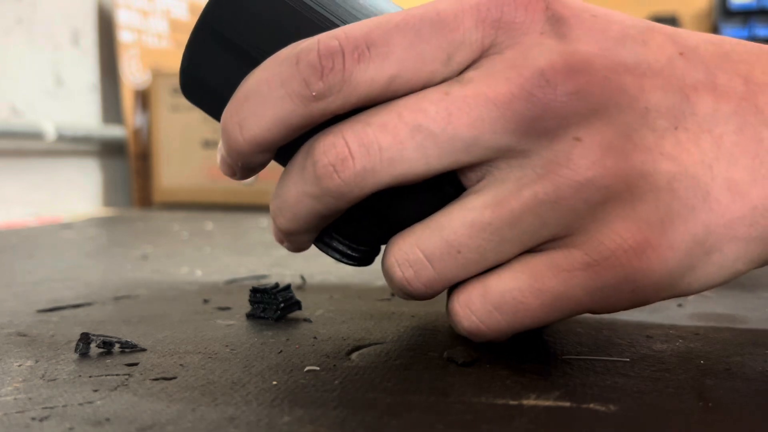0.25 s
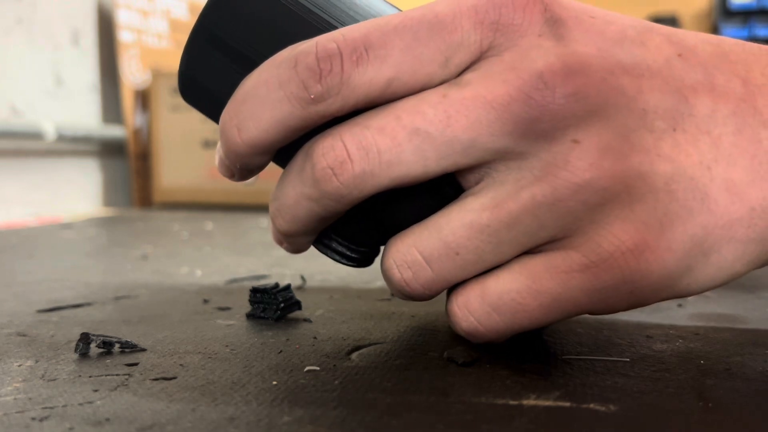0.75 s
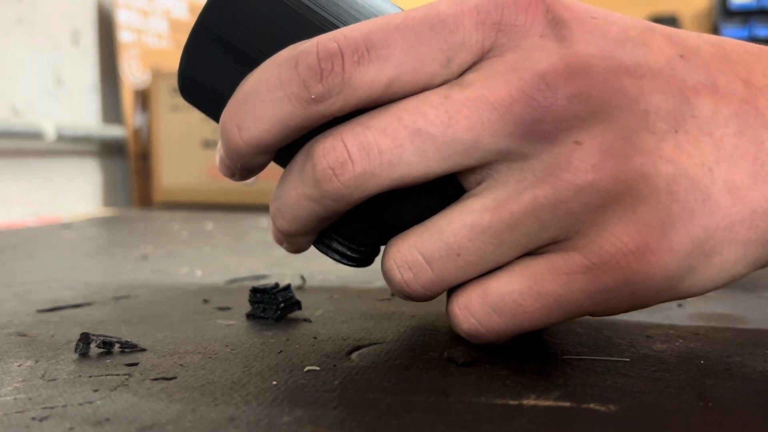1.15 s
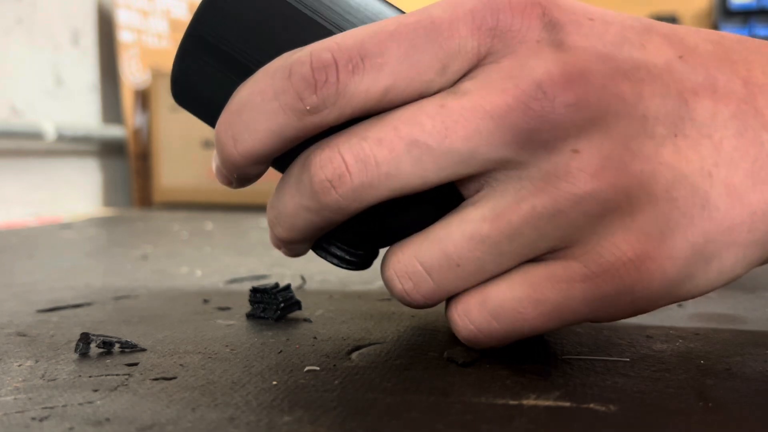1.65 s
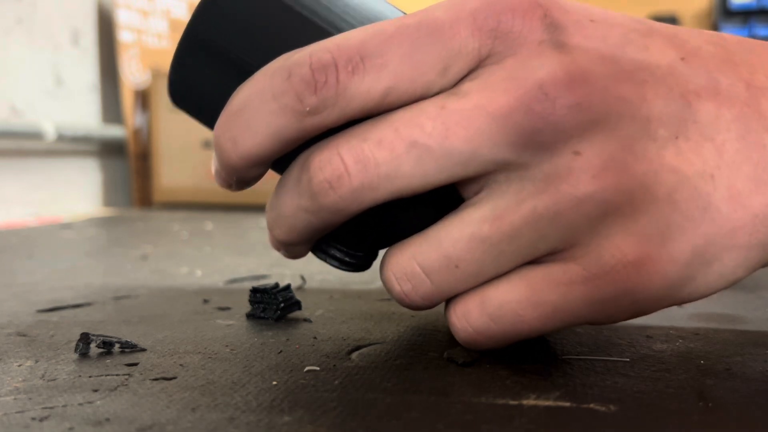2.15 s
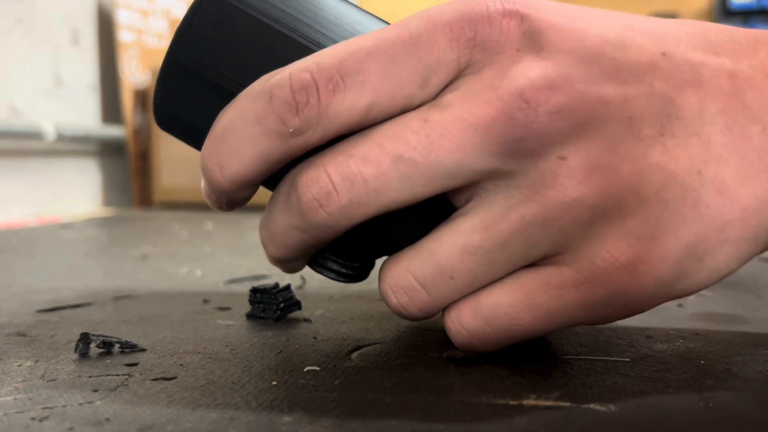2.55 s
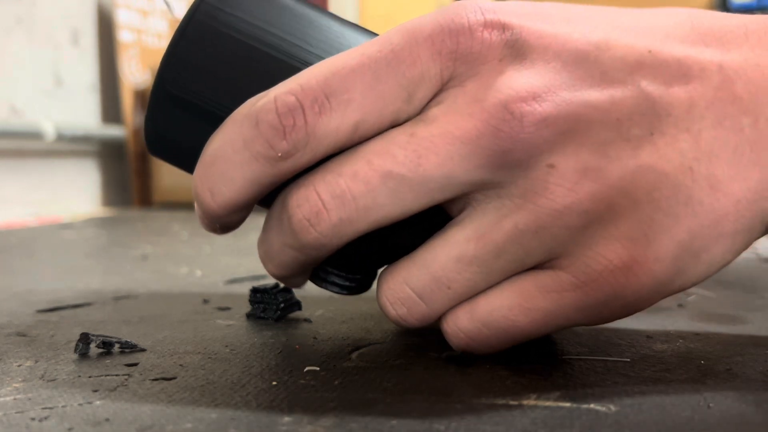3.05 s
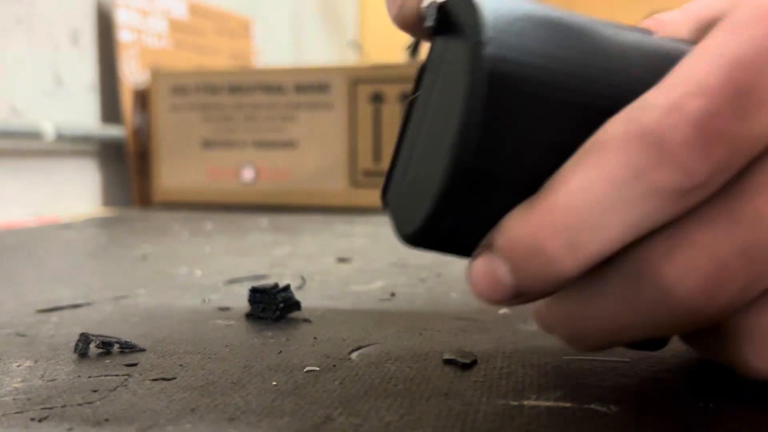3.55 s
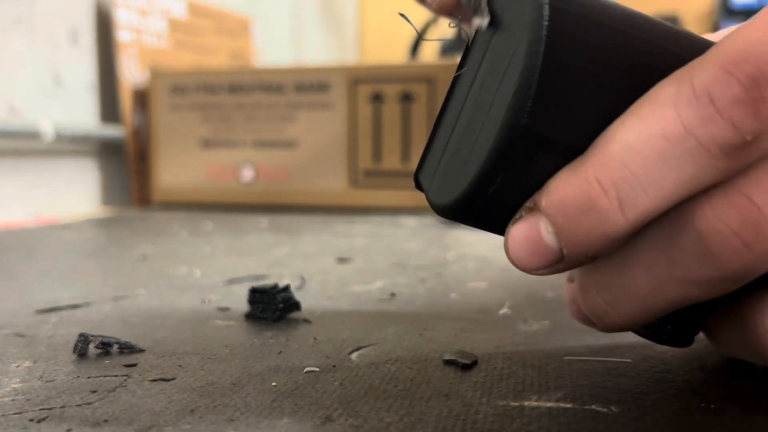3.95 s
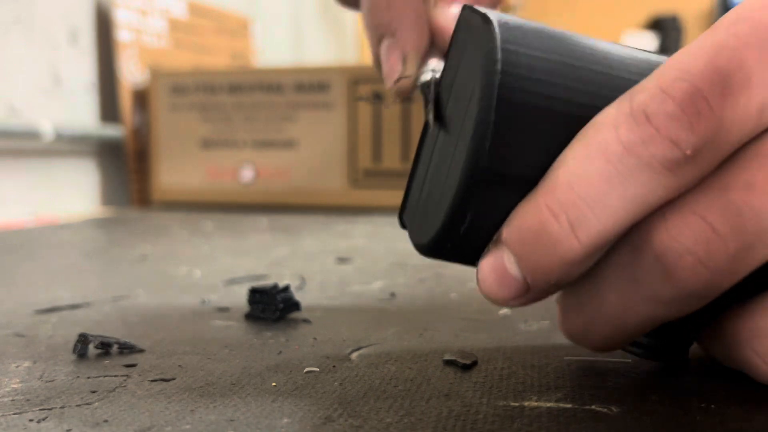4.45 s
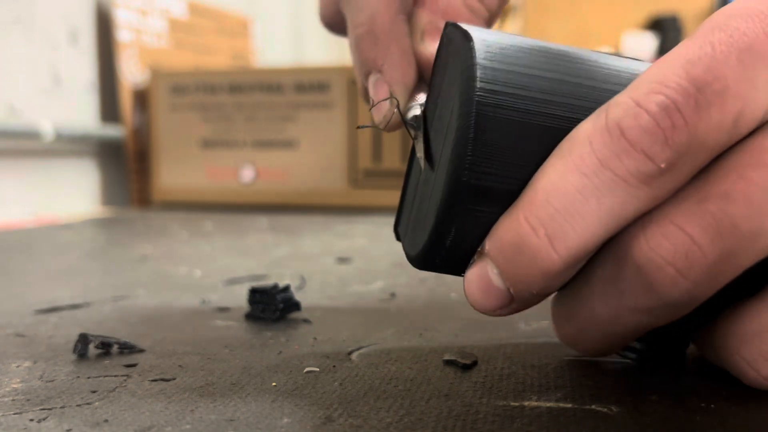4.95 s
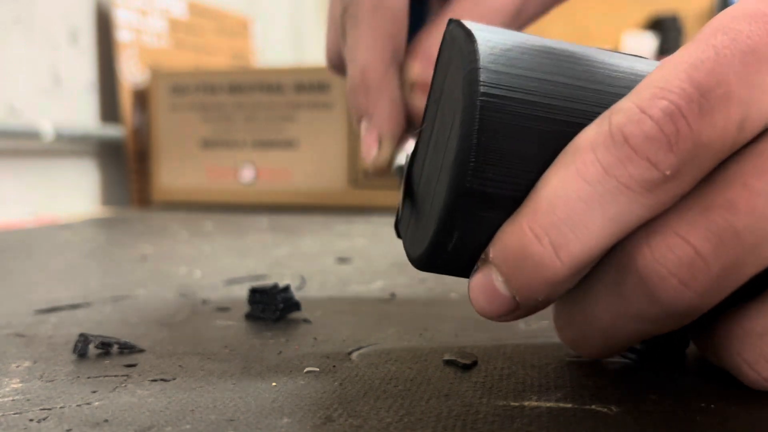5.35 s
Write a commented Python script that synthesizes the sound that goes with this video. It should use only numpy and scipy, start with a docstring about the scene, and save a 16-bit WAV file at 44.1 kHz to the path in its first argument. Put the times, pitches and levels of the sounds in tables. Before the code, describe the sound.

In a small workshop with soft mains hum and air noise, hands rumble and bump a bench. A hollow plastic part pops and snaps about three times, then a small blade scrapes it in short gritty strokes. A hard knock and crack come midway as the part is lifted, then scraping goes on with creaks and thuds. Close stereo microphone, short room echo.

```python
"""Mains hum, soft ventilation noise and the dull rumble of hands open in a small workshop, with low bench bumps.
From 0.47 s a hollow plastic print knocks in damped pops and ringing modes; its support snaps in noise cracks.
From 1.47 s a small blade scrapes it close by: random stick-slip grit coloured by edge, shell and bench.
Between 2.3 and 4.5 s the part is lifted into the hand: the hiss changes face and the wall rings less.
Narrow-band creaks join the strokes from 2.04 s, and the scraping runs on almost to the end."""
import sys
import numpy as np
from scipy import signal
from scipy.fft import rfft, irfft
from scipy.io import wavfile
from scipy.ndimage import uniform_filter1d

SR = 44100
rng = np.random.default_rng(int(sys.argv[2]) if len(sys.argv) > 2 else 0)


def master_out(mix):
    """Clip the mix to full scale and print it as 16-bit PCM to the path in sys.argv[1]."""
    frames = np.transpose(np.atleast_2d(mix))
    ceiling = np.clip(frames, -1, 1)
    pcm = np.round(ceiling * 32767).astype(np.int16)
    wavfile.write(sys.argv[1], SR, pcm)


N = 246959
TIME = np.arange(N) / SR
FREQ = np.fft.rfftfreq(2 * N, 1 / SR)


def undb(db):
    """Decibels to gain."""
    return 10 ** (np.asarray(db) / 20)


def unit(x):
    """Scale to rms 1."""
    return x / np.sqrt(np.mean(x ** 2))


def fade(t, t60):
    """Exponential decay, 60 dB down after t60."""
    return np.exp(-np.log(1000) * t / t60)


def add(track, s, sound):
    """Mix a sound into a track at time s."""
    i = int(s * SR)
    track[i:i + len(sound)] += sound[:N - i]


def colour(x, points):
    """Minimum-phase filter drawn through (f/Hz, level/dB) points, by folding the cepstrum."""
    hz, db = np.transpose(points)
    size = 8192
    grid = np.maximum(np.fft.rfftfreq(size, 1 / SR), 1)
    curve_db = np.interp(np.log(grid), np.log(hz), db)
    cepstrum = irfft(np.log(undb(curve_db)))
    cepstrum[1:size // 2] *= 2
    cepstrum[size // 2 + 1:] = 0
    response = irfft(np.exp(rfft(cepstrum)))
    return signal.fftconvolve(x, response)[:len(x)]


def band(x, hz, q):
    """One resonance of quality q."""
    return signal.lfilter(*signal.iirpeak(hz, q, fs=SR), x)


def soften(x, hz):
    """Two-pole low-pass."""
    return signal.lfilter(*signal.butter(2, hz, fs=SR), x)


def brighten(x, hz, poles):
    """High-pass."""
    return signal.lfilter(*signal.butter(poles, hz, "high", fs=SR), x)


def walk(rate):
    """Smooth random drift with an rms of 1, heading for a new value rate times a second."""
    k = int(SR / rate)
    steps = np.repeat(rng.standard_normal(N // k + 1), k)[:N]
    return unit(uniform_filter1d(steps, k))


# mains hum partials: f/Hz, level/dB (rms, about which each drifts)
HUM_PARTIALS = [(59.6, -51.5), (119.6, -55)]
# tone of the ventilation noise: f/Hz, level/dB (relative)
AIR_COLOUR = [(22, -14.5), (50, 5), (85, -2.5), (150, -11), (230, -10.5), (330, -16.5), (500, -15.5),
              (900, -22.5), (1400, -23), (2200, -35), (4000, -45), (8000, -57), (15000, -64)]


def workshop():
    """Mains hum over soft ventilation noise, whose long waves reach both ports alike."""
    hum = np.zeros(N)
    for hz, db in HUM_PARTIALS:
        level = undb(db + 1.0 * walk(2.7)) * np.sqrt(2)
        hum += level * np.sin(2 * np.pi * (hz * TIME + rng.random()))
    mid = unit(colour(rng.standard_normal(N), AIR_COLOUR))
    side = unit(colour(rng.standard_normal(N), AIR_COLOUR))
    side = brighten(side, 350, poles=1)
    return hum + undb(-57.0) * mid, undb(-55.5) * side


def room(x, t60, treble_t60, wet_db, bass_apart=0.93):
    """Short diffuse echo, more alike at both ports in the bass; the treble differs and dies first."""
    t, out = TIME[:SR // 2], []
    common = rng.standard_normal(len(t))
    for _ in range(2):
        noise = rng.standard_normal(len(t))
        low = soften(common + bass_apart * noise, 740)
        high = brighten(noise, 700, poles=2)
        tail = 0.51 * low * fade(t, t60) + 0.68 * high * fade(t, treble_t60)
        tail = tail * (t > .004)
        # the hands and the bench top scatter the treble within a few milliseconds
        near = high * fade(t, .011) * (t > .0004)
        response = undb(wet_db) * tail / np.linalg.norm(tail)
        response = response + undb(-10.0) * near / np.linalg.norm(near)
        out.append(signal.fftconvolve(x, response)[:N])
    return np.array(out)


# the two microphone ports: f/Hz, right's lead/rad, left minus right level/dB
PORT_OFFSETS = [(30, 0, 2), (130, 0, 2.4), (250, -.15, .3), (550, -.2, 4), (1300, .1, 2.6), (2200, -.1, 1),
                (3300, -.7, 1), (4600, -.1, 1), (5800, .4, 1), (7400, .1, 0), (8600, 1.7, 0),
                (9900, 3.1, 0), (11200, 4.6, 0), (12300, 6.1, 0), (13700, 6.5, 0), (15600, 9, 0)]


def ports(x):
    """Two ports a few centimetres apart: in step in the low bass, out of step in the treble."""
    hz, lead, pan_db = np.transpose(PORT_OFFSETS)
    # half the level and phase offset goes to each side
    half = undb(np.interp(FREQ, hz, pan_db) / 2) * np.exp(-.5j * np.interp(FREQ, hz, lead))
    spectrum = rfft(x, 2 * N)
    return irfft(np.array([spectrum * half, spectrum / half]))[:, :N]


# how the part is held, braced at first and then in the hand:
# t/s, shell rasp level/dB and bench level/dB (against blade force, before the mix), hand rumble level/dB at PUSH_DB
GRIP_POINTS = [(1.5, -13.5, 8, -42), (2.1, -13.5, 7.5, -45), (2.5, -11, -0.5, -33.5),
               (2.9, -6.5, 4.5, -37.5), (3.2, -9, -6.5, -41), (3.55, -7.5, -12.5, -50.5),
               (3.85, -2, 2, -51), (4.3, 1, -5, -37.5), (5.05, 4, 5, -45.5), (5.25, 0, 3.5, -32),
               (5.6, -1.5, 5.5, -29.5)]


def grip():
    """Shell, bench and rumble levels in dB as the hold changes."""
    s, *columns = np.transpose(GRIP_POINTS)
    return [np.interp(TIME, s, db) for db in columns]


PUSH_DB = -48  # blade force at which the hands rumble at the grip's level
PUSH_SHARE, SWAY_S = 0.46, 0.029  # exponent by which rumble follows force; time constant of its lag
RESTING_DB = -59  # rumble of hands that only hold the part
# each knock jolts the hands: level against the knock, rise time constant, decay
JOLT_DB, JOLT_RISE_S, JOLT_T60_S = -6, 0.011, 0.23
# tone of the hand rumble: f/Hz, level/dB (relative)
RUMBLE_COLOUR = [(25, -36), (42, -6.5), (55, 3), (85, 1.5), (115, 1), (155, -1.5), (215, -18), (325, -8.5),
                 (420, -23), (800, -46.5), (2000, -57.5)]


def hands(force):
    """Dull rumble of the hands: faint at rest, swelling behind each push, jolted by each knock."""
    push = (force / undb(PUSH_DB)) ** PUSH_SHARE
    keep = np.exp(-1 / (SWAY_S * SR))
    sway = signal.lfilter([1 - keep], [1, -keep], push) * undb(grip()[2])
    jolts, t = np.zeros(N), TIME[:SR // 2]
    for s, db, *_ in KNOCK_EVENTS:
        jolt = (1 - np.exp(-t / JOLT_RISE_S)) * fade(t, JOLT_T60_S)
        add(jolts, s, undb(db + JOLT_DB) * jolt)
    rumble = unit(colour(rng.standard_normal(N), RUMBLE_COLOUR))
    # level out the noise's own swells so that the hands alone shape it
    steady = rumble / np.sqrt(uniform_filter1d(rumble ** 2, int(.06 * SR)) + 1e-6)
    return steady * np.sqrt(undb(RESTING_DB) ** 2 + sway ** 2 + jolts ** 2)


BUMP_CYCLES = 10  # swings until a bump is 60 dB down
# hand and part bump the bench: t/s, level/dB (before the soft attack), f/Hz
BUMP_EVENTS = [(0.07, -36, 131), (0.18, -30.5, 66), (0.269, -32, 71), (0.477, -35, 85), (0.902, -31, 150),
               (1.714, -38, 74.5), (2.472, -19.5, 108), (2.643, -25, 205), (2.779, -23.5, 119.6),
               (3.251, -23.5, 136), (3.364, -33, 80), (4.267, -26, 70.6), (4.4, -32, 74), (4.731, -24, 55),
               (4.78, -24.5, 64.6), (5.228, -19.5, 73.6), (5.552, -33, 80)]


def bumping():
    """Soft flesh against the bench excites only a low sway: one soft-edged, dying sine a bump."""
    out, t = np.zeros(N), TIME[:SR // 3]
    for s, db, hz in BUMP_EVENTS:
        sway = np.sin(2 * np.pi * hz * t) * fade(t, BUMP_CYCLES / hz)
        add(out, s, undb(db) * sway * (1 - np.exp(-t / 0.0058)))
    return out


SNAP_T60_S = 0.014
# strands of support snap: t/s, level/dB (rms before the decay), centre f/Hz
SNAP_EVENTS = [(.4695, -53.5, 10000), (.469, -49.5, 2240), (0.8934, -52.5, 11400), (.894, -51.5, 3000),
               (1.184, -67, 11100), (1.5, -49, 6500), (1.8582, -40, 7440), (2.4676, -25.5, 1320),
               (2.544, -55.5, 6100), (2.761, -45.5, 7200), (3.0305, -46, 6600), (3.188, -41.5, 5960),
               (3.239, -43.5, 1620), (3.634, -49.5, 5000), (4.0252, -49, 6000), (4.217, -49.5, 10100),
               (4.257, -57, 2980), (4.3898, -38.5, 2580), (4.7134, -38.5, 13600), (4.716, -41.5, 4000),
               (4.719, -49, 6700), (4.7639, -31, 2020), (5.2125, -42, 2280), (5.256, -47, 7200),
               (5.269, -46.5, 6500), (5.3623, -61, 6000), (5.3796, -48.5, 5940), (5.388, -48.5, 4960),
               (5.5578, -47, 5960)]


def snapping():
    """Brittle strands break in short cracks, broad in band and dull above their own pitch."""
    out, t = np.zeros(N), TIME[:SR // 10]
    for s, db, hz in SNAP_EVENTS:
        top = min(1.83 * hz, .45 * SR)
        crack = band(rng.standard_normal(len(t)), hz, q=1)
        crack = soften(soften(crack, top), top)
        add(out, s, undb(db) * unit(crack) * fade(t, SNAP_T60_S))
    return out


# wall of the hollow print: f/Hz, level/dB (relative), t60/s
WALL_PARTIALS = [(2920, 3, 0.069), (2900, -37, 0.046), (2760, -35, .03), (2260, -35, .035)]


def wall_ring():
    """The print's wall, struck once: a sum of decaying sines."""
    t = TIME[:SR // 4]
    return sum(undb(db) * np.sin(2 * np.pi * hz * t) * fade(t, t60) for hz, db, t60 in WALL_PARTIALS)


# colour of vibration through the bench: f/Hz, level/dB (relative)
BENCH_COLOUR = [(90, 0), (160, -6), (230, -13.5), (330, 0.5), (420, -2), (530, 3), (720, -2), (900, -0.5),
                (1150, -9), (1600, -23), (3000, -37.5)]


def through_bench(x):
    """Vibration as the bench top passes it on, at rms 1."""
    return unit(colour(x, BENCH_COLOUR))


POP_EVEN_HZ = 387.4  # contact bandwidth at which the pop takes the knock's level
POP_DB_PER_OCTAVE = 18  # pop gain with harder contact
RING_DB = -43.5  # gain of the wall ring against the pop's
# bench top and part together: f/Hz, level/dB (relative), t60/s
BENCH_PARTIALS = [(63, -25, .25), (115, -2.5, 0.15), (146.4, 1, 0.18), (182, 0, 0.087), (259, -7.5, 0.19),
                  (332.1, -1, 0.18), (384, -3.5, 0.099), (495, 7, 0.028), (527, 1, 0.11),
                  (596, -4.5, 0.084), (653, -7, 0.04), (786, -22, .08), (915, -11, 0.038),
                  (1164, -26, 0.17), (1454, -9, 0.048)]
# the part knocks: t/s, level/dB (before the bench mix), contact bandwidth f/Hz, # settled pop f/Hz, pop t60/s
KNOCK_EVENTS = [(0.4688, -33, 553, 517, 0.053), (0.8942, -33, 500, 547, 0.014),
                (1.185, -37, 385, 475, 0.024), (1.5486, -28.5, 750, 549, 0.02),
                (2.4676, -23, 1045, 537, 0.0057), (2.6372, -23.5, 455, 503, 0.024),
                (2.7748, -35.5, 650, 630, 0.0078), (3.24, -49, 660, 1050, .012),
                (4.005, -37, 236, 400, 0.016), (4.023, -41.5, 370, 604, 0.012),
                (4.764, -35, 1150, 673, 0.007), (5.2108, -40.5, 774, 1500, 0.0032)]


def knocking():
    """A quickly damped pop of the hollow part with the bench's modes and the ring of the wall."""
    out, t = np.zeros(N), TIME[:SR // 2]
    onset = 1 - np.exp(-t / 0.0012)
    for s, bench_db, contact_hz, hz, t60 in KNOCK_EVENTS:
        pop_db = bench_db + POP_DB_PER_OCTAVE * np.log2(contact_hz / POP_EVEN_HZ)
        # the pop starts sharp and sinks, the more so the harder the contact
        pitch = hz * (1 + contact_hz / 1350 * np.exp(-t / 0.00075))
        pop = np.sin(2 * np.pi * np.cumsum(pitch) / SR) * fade(t, t60) * onset
        modes = np.zeros(len(t))
        for f, db, ring_t60 in BENCH_PARTIALS:
            modes += undb(db) * np.sin(2 * np.pi * (f * t + rng.random())) * fade(t, ring_t60)
        rattle = through_bench(rng.standard_normal(len(t))) * fade(t, 0.069)
        # softer contact dulls the bench
        bench = soften((undb(-5.0) * modes + undb(-4.5) * rattle) * onset, contact_hz)
        add(out, s, undb(pop_db) * pop + undb(bench_db) * bench)
        add(out, s, undb(pop_db + RING_DB) * wall_ring())
    return out


CREAK_S = .028
# the edge catches: middle t/s, level/dB (rms at the top of the swell), f/Hz
CREAK_EVENTS = [(2.042, -62, 2830), (3.076, -58, 2884), (3.255, -60, 3400), (3.402, -61.5, 3160),
                (3.475, -52.5, 3010), (4.264, -51, 2890), (5.04, -57.5, 2670)]


def squeaking():
    """The edge catches for a moment and the plastic creaks at one pitch: swelled narrow-band noise."""
    out = np.zeros(N)
    swell = np.hanning(int(CREAK_S * SR))
    for s, db, hz in CREAK_EVENTS:
        # the end of the noise, where the resonance has built up
        tone = unit(band(rng.standard_normal(SR // 4), hz, q=30))[-len(swell):]
        add(out, s - CREAK_S / 2, undb(db) * swell * tone)
    return out


RELEASE_S = 0.025  # the blade lets go
SWELL_DB = 3  # the force is greater at mid-stroke than at its ends
# blade strokes: start t/s, end t/s, mid-stroke force level/dB (at full contact), time to dig in t/s
STROKE_EVENTS = [(1.47, 1.564, -48.5, 0.015), (1.564, 1.733, -60.5, 0.032), (1.796, 1.85, -60.5, 0.012),
                 (1.826, 1.914, -49, 0.019), (1.985, 2.069, -53.5, 0.025), (2.074, 2.156, -48, 0.028),
                 (2.411, 2.486, -44.5, 0.031), (2.572, 2.704, -61.5, .014), (2.7, 2.809, -54.5, 0.048),
                 (2.891, 2.982, -58.5, 0.019), (3.002, 3.092, -54, 0.0071), (3.086, 3.204, -56, .012),
                 (3.162, 3.233, -44.5, 0.022), (3.198, 3.439, -55, .015), (3.431, 3.527, -54.5, 0.031),
                 (3.5, 3.66, -58, 0.038), (3.627, 3.99, -79.5, .02), (3.736, 3.85, -66, 0.033),
                 (3.913, 4.028, -62.5, 0.098), (4.085, 4.175, -52.5, 0.016), (4.196, 4.323, -58, 0.032),
                 (4.326, 4.456, -51.5, 0.077), (4.445, 4.506, -59, 0.015), (4.54, 4.662, -68, 0.032),
                 (4.651, 4.787, -58, 0.048), (4.995, 5.124, -59, 0.016), (5.145, 5.253, -50.5, .07),
                 (5.243, 5.293, -60.5, .015), (5.364, 5.498, -61, 0.044), (5.499, 5.588, -55, 0.017)]


def blade_force():
    """Every stroke bites, swells towards its middle and lets go; overlapping strokes add in power."""
    power = np.zeros(N)
    for start, end, db, bite in STROKE_EVENTS:
        dig = np.clip((TIME - start) / bite, 0, 1)
        release = np.clip((end - TIME) / RELEASE_S, 0, 1)
        arch = np.sin(np.pi * (TIME - start) / (end - start))
        power += (undb(db + SWELL_DB * (arch - 1)) * dig * release) ** 2
    return np.sqrt(power)


def slips(per_s, spread_db):
    """Tiny stick-slip releases of uneven size as the edge crosses layer lines."""
    hit = rng.random(N) < per_s / SR
    size = undb(spread_db * np.minimum(rng.exponential(size=N), 4))
    return unit(hit * rng.choice([-1, 1], N) * size)


def rim_echo(x, lag_s, travel, share):
    """Vibration returns from the rim; the lag wanders as the blade travels, so the colour shifts."""
    lag = lag_s * np.exp(travel * walk(9))
    echo = np.interp(np.arange(N) - lag * SR, np.arange(N), x)
    return unit(x + share * echo)


HELD_DAMPING = 0.72  # share of the drive to the wall's ring that the hand takes away
# the part leaves the bench: start t/s, end t/s
LIFT_SPAN = [2.3, 4.53]
# edge hiss with the part braced on the bench: f/Hz, level/dB (relative)
BRACED_COLOUR = [(2500, -37), (3500, -20), (4200, -2.5), (4700, -10), (5400, -6.5), (6500, 2.5), (7200, -1),
                 (8000, -1.5), (9000, -9), (10500, -9.5), (12000, -5), (13800, -6.5), (15500, -4)]
# edge hiss with the part held in the hand: f/Hz, level/dB (relative)
HELD_COLOUR = [(2500, -32), (3700, 0), (4400, 1), (5300, -2.5), (6000, 1), (7100, 0), (7800, -20.5),
               (8600, -1), (9500, -18), (11500, -7.5), (12500, -9.5), (13800, 2), (15500, -19)]
# colour of a scrape through the shell: f/Hz, level/dB (relative)
SHELL_COLOUR = [(250, -13), (600, 10), (1100, 10.5), (1600, 6.5), (2300, 5), (2700, 3.5), (3100, -0.5),
                (3550, -8.5), (4300, 0), (8000, -29.5)]


def scraping(edge):
    """Each stroke chatters at the edge, in the shell and, through the grip, in the bench."""
    shell_db, bench_db, _ = grip()
    shell, bench = edge * undb(shell_db), edge * undb(bench_db)
    roughness_db = 1.63 * walk(160) + 0.85 * walk(40)
    grit = slips(per_s=2600, spread_db=0.5) * undb(roughness_db)
    # now and then the edge hooks a whole layer line and lets go with a coarser tick
    grit = grit + undb(-9.5) * slips(per_s=170, spread_db=-1.8)
    grit = rim_echo(grit, lag_s=0.0006005, travel=0.407, share=0.51)
    # lifting the part into the hand damps its wall and turns another face to the microphone
    held = np.interp(TIME, LIFT_SPAN, [0, 1])
    hiss = (1 - held) * unit(colour(grit, BRACED_COLOUR)) + held * unit(colour(grit, HELD_COLOUR))
    ring = wall_ring()
    drive = grit * shell * (1 - HELD_DAMPING * held)
    singing = signal.fftconvolve(drive, ring / np.linalg.norm(ring))[:N]
    rasp = undb(-0.5 + 1.9 * held) * shell * unit(colour(grit, SHELL_COLOUR))
    chatter = undb(-0.5) * bench * through_bench(grit)
    return undb(-3.5) * edge * hiss + rasp + chatter + undb(-1.5) * singing


def scene():
    """The handwork close by, the workshop around it."""
    force = blade_force()
    steady, diffuse = workshop()
    work = hands(force) + bumping() + snapping() + knocking() + squeaking() + scraping(force)
    echo = room(work, t60=0.24, treble_t60=0.16, wet_db=-17.0)
    # the diffuse air has opposite sign at the two ports
    return ports(work + steady) + echo + diffuse * np.array([[1], [-1]])


TOP_HZ = 15500


def record(dry):
    """The recorder cuts the top with a steep low-pass."""
    return signal.sosfilt(signal.ellip(10, .2, 70, TOP_HZ, fs=SR, output="sos"), dry)


dry = scene()
out = record(dry)
master_out(out)
```